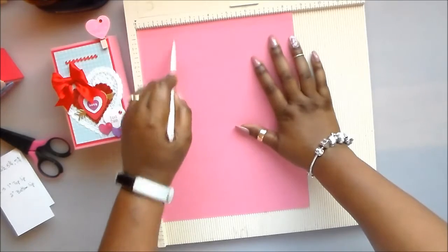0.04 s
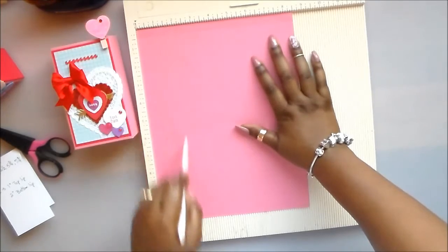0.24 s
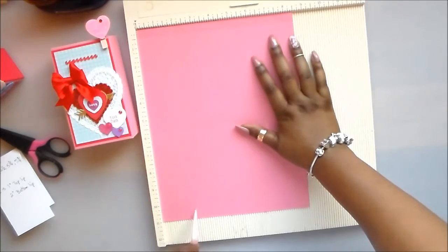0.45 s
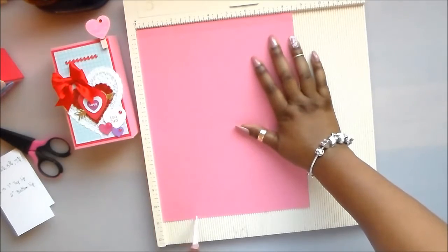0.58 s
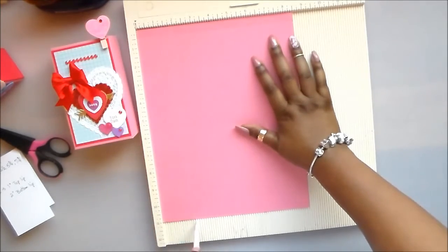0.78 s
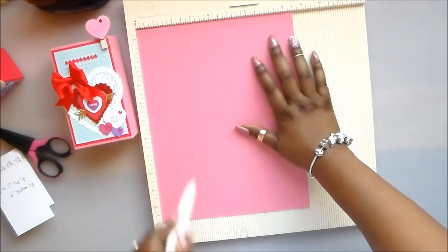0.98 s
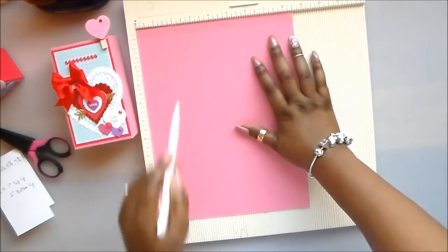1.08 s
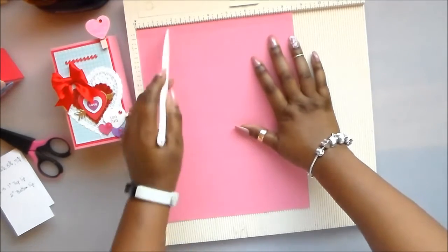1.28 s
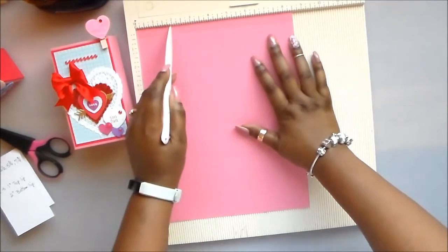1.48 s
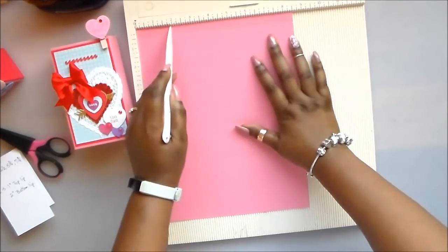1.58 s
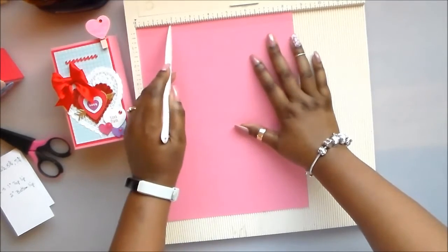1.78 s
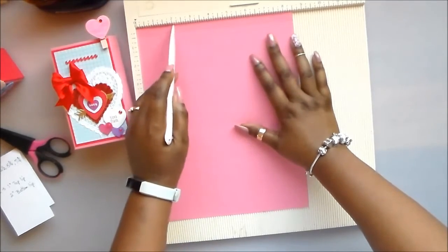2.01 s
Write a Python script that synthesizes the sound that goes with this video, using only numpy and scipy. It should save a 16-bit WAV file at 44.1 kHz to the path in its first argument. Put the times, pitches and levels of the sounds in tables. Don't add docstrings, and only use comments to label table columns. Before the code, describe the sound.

Close up on a desk in a small room, a rough hissing stroke over card stock ends with a hollow clack, then a lull, bright ticks and a run of small knocks above faint hum and hiss.

```python
import sys
import numpy as np
from scipy import signal
from scipy.io import wavfile
from scipy.ndimage import uniform_filter1d

SR = 44100
rng = np.random.default_rng(int(sys.argv[2]) if len(sys.argv) > 2 else 0)


def store_wav(level_fs):
    pcm = np.round(np.clip(np.atleast_2d(level_fs), -1, 1) * 32767)
    wavfile.write(sys.argv[1], SR, pcm.T.astype(np.int16))


def voltage_ratio(decibels):
    exponent = np.asarray(decibels, float) / 20
    return 10 ** exponent


N = 90404

# (frequency [Hz], level [dB], t60 [s])
BOARD = [(250, -41, 0.024), (321.8, -2, 0.077), (400.3, -2, 0.061), (500, -2.5, 0.057), (562.3, 2, 0.035),
         (656, -3.5, 0.045), (760, -2, 0.045), (906.7, -1.5, 0.05), (1014, -5, 0.049), (1194, -10, 0.051),
         (1382, -15, 0.071), (1558, 3.5, 0.0069), (1942, -21, 0.056), (2460, -60, 0.0073)]
# (frequency [Hz], correlation [-1 to 1])
LIKENESS = [(700, 1), (1600, 1), (3000, 1), (5000, 0.84), (9000, 0.25), (15000, 0.67)]
RIBS_FROM_S = 1.6


def rms_one(x):
    return x / np.sqrt(np.mean(x ** 2) + 1e-20)


def in_time(rows):
    s, *columns = np.transpose(rows)
    return [np.interp(np.arange(N) / SR, s, column) for column in columns]


def at_hz(points, hz):
    return np.interp(np.log(hz), np.log(np.array(points)[:, 0]), np.array(points)[:, 1])


def high_pass(x, hz, order=2):
    return signal.sosfilt(signal.butter(order, hz, "high", fs=SR, output="sos"), x)


def top_cut(x):
    return signal.sosfilt(signal.ellip(8, 1, 40, 14200, fs=SR, output="sos"), x)


def drift(rate):
    r = np.exp(-80 * np.pi * rate / SR)
    white = rng.standard_normal(N // 40 + 2002)
    slow = signal.lfilter([1], [1, -2 * r, r * r], white)[2000:]
    return np.interp(np.arange(N) / 40, np.arange(len(slow)), rms_one(slow - slow.mean()))


def ring(x, hz, t60):
    r, w = voltage_ratio(-60 / (t60 * SR)), 2 * np.pi * hz / SR
    return signal.lfilter([0, np.sin(w)], [1, -2 * r * np.cos(w), r * r], x + 1e-18)


def narrow(hz, width):
    t60 = np.log(1000) / np.pi / width
    once = ring(rng.standard_normal(N + SR), hz, t60)
    return rms_one(ring(once, hz, t60)[SR:])


def banded(spectrum, likeness, patchy_db):
    octaves = np.log2(spectrum[-1][0] / spectrum[0][0])
    edges = spectrum[0][0] * 2 ** np.arange(0, octaves + .5, .5)
    white = rng.standard_normal((2, 2, N))
    out = 0
    for k, (low, high) in enumerate(zip(edges, edges[1:])):
        band = signal.butter(2, [low, min(high, SR * .45)], "band", fs=SR, output="sos")
        mid, side = signal.sosfilt(band, white[k % 2])
        hz = np.sqrt(low * high)
        alike = np.clip(at_hz(likeness, hz), -1, 1)
        gain = voltage_ratio(at_hz(spectrum, hz) + patchy_db * drift(17.0))
        out = out + gain * (np.sqrt(1 + alike) * mid + np.sqrt(1 - alike) * side * [[1], [-1]])
    return rms_one(out)


def bursts(rows, attack_ms):
    t_ms = np.arange(N) / SR * 1000
    out = np.zeros(N)
    for s, db, ms in rows:
        age = np.maximum(t_ms - s * 1000, 0)
        out += voltage_ratio(db) * (1 - np.exp(-age / attack_ms)) * np.exp(-age / max(ms, .3))
    return out


def background():
    # (frequency [Hz], level [dB per Hz])
    air_spectrum = [(12, -12), (40, -5.5), (150, -16), (340, -14), (600, -22), (1900, -30), (4000, -33),
                    (15000, -36)]
    # (frequency [Hz], correlation [-1 to 1])
    air_likeness = [(30, 0.99), (150, 0.81), (400, 0.92), (940, 0.43), (3750, -0.092), (14900, -0.16)]
    # (frequency [Hz], waver rate [per s], level [dB])
    hum_lines = [(33, 3.2, -64), (63.2, 9.2, -68.5), (13.29, 2.7, -58)]
    # (time [s], gain [dB])
    agc = [
        (0, 1.5),
        (0.3, 4.5),
        (0.82, 3),
        (0.9, 0.5),
        (1.1, -5.5),
        (1.4, -1),
        (1.6, 4),
        (2.05, 2),
    ]
    air_db, waver_db = -55, 1.3
    drone_hz, drone_db, drone_waver = 101.2, -54.5, 1.8
    throb_share, throb_per_s, throb_peak_s = 0.37, 6.25, .08
    whine_hz, whine_db, whine_from_s, whine_to_s = 3220, -76.5, 1.14, 1.47
    t = np.arange(N) / SR
    ear_phase = np.array([[.22], [-.22]])
    air = top_cut(banded(air_spectrum, air_likeness, patchy_db=1.36)) * voltage_ratio(air_db)
    hum = 0
    for hz, rate, db in hum_lines:
        level = voltage_ratio(db + 2.5 + waver_db * drift(rate))
        hum = hum + level * np.sin(2 * np.pi * hz * t + 1.5 * drift(rate) + ear_phase)
    throb = 1 + throb_share * np.cos(2 * np.pi * throb_per_s * (t - throb_peak_s))
    drone = np.sin(2 * np.pi * drone_hz * t + 0.37 * drift(drone_waver) + ear_phase)
    hum = hum + voltage_ratio(drone_db + waver_db * drift(drone_waver)) * throb * drone
    whine = narrow(whine_hz, 110)
    whine = whine / np.sqrt(uniform_filter1d(whine ** 2, size=SR // 20))
    fade = np.clip(np.minimum(t - whine_from_s, whine_to_s - t) / 0.03, 0, 1)
    return voltage_ratio(in_time(agc)[0]) * (air + hum * voltage_ratio([[.5], [-.5]])) + voltage_ratio(whine_db) * whine * fade


def ticks():
    # (time [s], peak [dB], length [ms], ring [Hz], ring t60 [s])
    contacts = [
        (0.814, -51, 13, 4430, 0.015),
        (1.15, -55, 2.7, 3460, 0.0098),
        (1.452, -50, 3.8, 3430, .02),
        (1.4665, -52, 1.9, 9000, .01),
        (1.4757, -26.5, 4.3, 3040, 0.032),
        (1.547, -35, 1.7, 3800, 0.016),
        (1.5501, -32, 1.2, 5780, 0.036),
        (1.7157, -42.5, 2.2, 4330, 0.022),
        (1.832, -50, 1.7, 4300, .02),
    ]
    # (time [s], peak [dB], length [ms])
    snaps = [
        (1.5468, -30.5, 1.2),
        (1.7155, -44, 1.2),
    ]
    # (frequency [Hz], level [dB per Hz])
    tick_spectrum = [(710, -26), (1200, 4.5), (3030, -7.5), (3710, 4.5), (4840, -1.5), (5930, -8),
                     (13500, -8), (15300, -38)]
    noise = banded(tick_spectrum, LIKENESS, patchy_db=2)
    out = bursts(snaps, attack_ms=.1) * noise
    for s, db, ms, hz, t60 in contacts:
        click = bursts([(s, db - 5.0, ms)], attack_ms=0.18)
        tail = bursts([(s, db - 18.5, 18)], attack_ms=0.91)
        burst = (click + tail) * noise
        out = out + burst + voltage_ratio(-28) * ring(burst.mean(axis=0), hz, t60)
    return out


def struck_modes(blows):
    favour_db_per_oct, modes_db = 1.5, -15
    out = np.zeros(N + SR)
    luck = rng.random((len(blows), len(BOARD), 3))
    for k, (hz, level_db, t60) in enumerate(BOARD):
        push = np.zeros(N + SR)
        for (s, db, _, best_hz, ms), (u, late, flip) in zip(blows, luck[:, k]):
            off_pitch_db = favour_db_per_oct * abs(np.log2(hz / best_hz))
            db_here = db + .5 * level_db - off_pitch_db + 5 * u + modes_db
            push[int((s + abs(ms) * late / 1000) * SR)] += voltage_ratio(db_here) * np.sign(flip - .5)
        out += ring(push, hz, t60 * 0.38) + voltage_ratio(-13) * ring(push, hz * 1.03, t60 * 2.0)
    return out


def knocks():
    # (time [s], peak [dB], crack re peak [dB], favoured pitch [Hz], spread of arrival [ms])
    blows = [(0.683, -39.5, -8, 392, 1.7), (0.719, -36, -12, 468, 2.3), (0.8389, -11, -10.5, 478, 1.53),
             (0.8397, -17.5, -30, 290, 1.22), (0.84, -16, -21.5, 1042, 2.3), (0.843, -18, -15, 498, 2.24),
             (0.894, -34.5, -38, 530, 2.15), (1.006, -38, -13, 500, 2.86), (1.4623, -24, -16.5, 1014, 0.95),
             (1.4719, -19, -24, 529, 1.2), (1.4727, -22.5, -35, 936, 1.03), (1.483, -23, -15, 794, 2.7),
             (1.496, -37, -33, 784, 2.4), (1.516, -30.5, -33, 760, 4.1), (1.653, -36.5, -35, 568, 2.33),
             (1.7615, -27.5, -12, 710, 1.03), (1.7663, -24.5, -40, 420, 1.45),
             (1.781, -26.5, -23, 468, 1.07), (1.811, -34.5, -33, 925, 1.46), (1.815, -36, -37, 416, 1.34),
             (1.828, -32, -14.5, 690, 2), (1.834, -38.5, -32, 856, 1.35), (1.853, -28.5, -17, 518, 2),
             (1.886, -28, -29, 538, 1.89), (1.9204, -27.5, -23, 450, 1.31)]
    # (frequency [Hz], level [dB per Hz])
    crack_spectrum = [(880, -37), (1500, 2.5), (2700, -12.5), (3640, -5.5), (13200, -22), (14400, -30),
                      (15000, -62)]
    thud_db, thud_t60_s, rib_damping = -3, 0.044, 0.56
    rap_hz, rap_db, rap_t60_s = 1504, -13, 0.017
    contact_ms, blow_cut_hz = 0.039, 164
    out = struck_modes(blows)
    age = np.arange(SR // 5) / SR
    for s, db, _, best_hz, _ in blows:
        on_ribs = s > RIBS_FROM_S
        t60 = thud_t60_s * (rib_damping if on_ribs else 1)
        onset = 1 - np.exp(-age / 0.00049)
        thud = voltage_ratio(db + thud_db - 60 * age / t60) * np.sin(2 * np.pi * best_hz * age) * onset
        rap = voltage_ratio(db + rap_db - 60 * age / rap_t60_s) * np.sin(2 * np.pi * rap_hz * age)
        out[int(s * SR):][:len(age)] += on_ribs * rap - thud
    soft = np.hanning(int(2 * contact_ms / 1000 * SR) + 3)
    body = high_pass(np.convolve(out, soft / soft.sum())[:N], blow_cut_hz)
    cracks = [(s, db + rel_db, 2.8) for s, db, rel_db, _, _ in blows]
    tails = [(s, db - 16.5, 22) for s, db, _ in cracks]
    crack = bursts(cracks, attack_ms=0.34) + bursts(tails, attack_ms=1.2)
    return body + crack * banded(crack_spectrum, LIKENESS, patchy_db=0.5)


def skips():
    # (time [s], change [dB], half length [ms])
    jumps = [
        (0.207, 5, 4.6),
        (0.27, 4, 4.1),
        (0.285, 4.5, 4.3),
        (0.406, -14, 4.7),
        (0.415, -9, 2.3),
        (0.426, 4.5, 6),
        (0.436, -17, 4.2),
    ]
    t = np.arange(N) / SR
    return voltage_ratio(sum(db * np.exp(-((t - s) * 1000 / ms) ** 2) for s, db, ms in jumps))


def hollow():
    tone = narrow(533, 74)
    tone = tone / np.sqrt(uniform_filter1d(tone ** 2, size=SR // 60))
    peak_s, half_s = 0.402, 0.078
    swell = np.exp(-((np.arange(N) / SR - peak_s) / half_s) ** 2)
    return voltage_ratio(-26) * skips() * tone * swell


def board_under_slips(best_hz, lift_db):
    slips_per_s, slip_spread_db, lump_db = 3000, 2.5, 3
    even_s, even_share = .04, .6
    sizes = voltage_ratio(slip_spread_db * np.minimum(rng.exponential(1, N), 4)) * rng.choice([-1, 1], N)
    slips = sizes * (rng.random(N) < slips_per_s / SR) * voltage_ratio(lump_db * drift(73))
    body = 0
    for k, (hz, db, t60) in enumerate(BOARD):
        off_pitch_db = 9.2 * abs(np.log2(hz / best_hz))
        gain = voltage_ratio(db + 1.42 * drift(1.8) - off_pitch_db + lift_db * (hz > 1100))
        body = body + gain * ring(slips, hz, t60) * (-1) ** k
    body = high_pass(body, 190)
    power = uniform_filter1d(body ** 2 + 1e-12, size=int(even_s * SR))
    return rms_one(body / power ** (even_share / 2))


def tip_hiss():
    # (frequency [Hz], level [dB per Hz])
    hiss_spectrum = [(880, -75), (1500, 1.5), (2100, -6.5), (2700, -7.5), (4250, -10.5), (6300, -14),
                     (12000, -19), (14300, -32), (15000, -62)]
    # (frequency [Hz], width [Hz], level re hiss [dB], loudest at [s], half length [s])
    squeaks = [(1435, 250, 5.5, 0.313, 0.041), (1635, 180, 0.5, 0.452, 0.041), (1970, 230, -2, 0.334, .03),
               (1950, 150, -1, 0.573, 0.042), (1190, 250, -3, 0.564, 0.067), (2740, 270, -4.5, 0.46, 0.052),
               (4130, 340, -8.5, 0.413, 0.12), (4600, 220, -8, 0.59, 0.046), (12000, 400, -17, 0.18, 0.21),
               (11850, 550, -16, 0.54, 0.2)]
    t = np.arange(N) / SR
    hiss = banded(hiss_spectrum, LIKENESS, patchy_db=1.6)
    for hz, width, db, s, half in squeaks:
        hiss = hiss + voltage_ratio(db) * np.exp(-((t - s) / half) ** 2) * narrow(hz, width)
    return top_cut(hiss * voltage_ratio(.9 * drift(53)))


def drag():
    # (time [s], level [dB], brightness [dB], favoured pitch [Hz], lift of the upper modes [dB])
    stroke = [
        (0.1, -68, 10, 516, 0),
        (0.195, -49.5, -9, 510, -13),
        (0.21, -42, -13.5, 490, 3),
        (0.302, -30.5, -15, 470, 14.5),
        (0.392, -25, -16, 510, -0.5),
        (0.499, -31, -13, 417, -4),
        (0.594, -39.5, -11.5, 660, 10.5),
        (0.637, -48.5, -13.5, 413, 5),
        (0.8, -63, -28, 415, 16),
    ]
    # (time [s], level [dB], favoured pitch [Hz])
    creeping = [
        (0.8, -61.5, 400),
        (0.86, -40, 500),
        (1.0, -55, 500),
        (1.12, -67, 398),
        (1.4, -69, 345),
        (1.5, -46, 760),
        (1.6, -54, 710),
        (1.72, -61.5, 600),
        (1.8, -48.5, 500),
        (2.05, -62.5, 460),
    ]
    t = np.arange(N) / SR
    start_s, end_s = stroke[0][0], stroke[-1][0]
    level_db, bright_db, best_hz, lift_db = in_time(stroke)
    creep_db, creep_hz = in_time(creeping)
    best_hz = np.where(t < end_s, best_hz, creep_hz)
    lift_db = np.where(t < end_s, lift_db, 2)
    on = np.clip(np.minimum(t - start_s, end_s - t) / 0.071, 0, 1)
    creep = voltage_ratio(creep_db)
    body_gain = on * skips() * voltage_ratio(level_db) + creep
    hiss_gain = on * voltage_ratio(level_db + bright_db + 5.0) + creep * voltage_ratio(-9.5)
    return body_gain * board_under_slips(best_hz, lift_db) + hiss_gain * tip_hiss()


def room(x):
    t60_s, wall_cut_hz = 0.078, 14000
    out, dull = np.zeros((2, N)), np.exp(-2 * np.pi * wall_cut_hz / SR)
    lags = (rng.uniform(.008, .03, 12) * SR).astype(int)
    for k, lag in enumerate(lags):
        loop, gain, state = x.copy(), voltage_ratio(-60 * lag / SR / t60_s), [0.]
        for i in range(lag, N, lag):
            back, state = signal.lfilter([gain * (1 - dull)], [1, -dull], loop[i - lag:i], zi=state)
            loop[i:i + lag] += back[:N - i]
        out[k % 2] += (loop - x) * (-1) ** (k // 2)
    side = high_pass(out[0] - out[1], 2500)
    return (out[0] + out[1] + side * np.array([[1], [-1]])) / 2


def scene():
    desk = drag() + knocks() + ticks()
    return desk + voltage_ratio(-5.5) * room(desk.mean(axis=0)) + background() + hollow()


def low_pass(x):
    return signal.sosfilt(signal.butter(12, 15460, fs=SR, output="sos"), x)


def record(dry):
    top = high_pass(dry, 6000, order=1)
    saturated = .33 * np.tanh(dry / 0.32)
    ports = saturated + .09 * top * np.array([[1], [-1]])
    mix = signal.sosfilt(signal.cheby2(12, 70, 15250, fs=SR, output="sos"), ports)
    return low_pass(mix)


dry = scene()
out = record(dry)
store_wav(out)
```